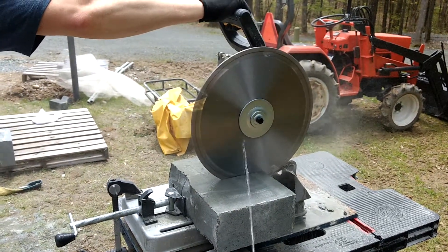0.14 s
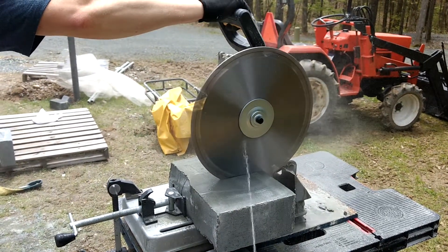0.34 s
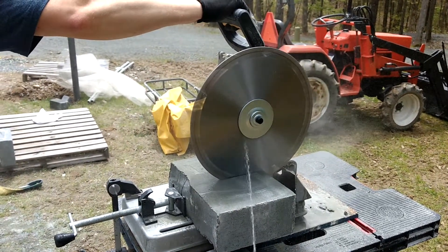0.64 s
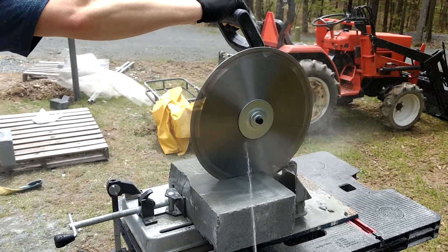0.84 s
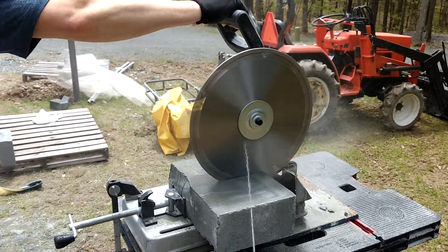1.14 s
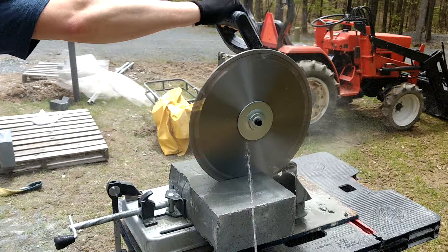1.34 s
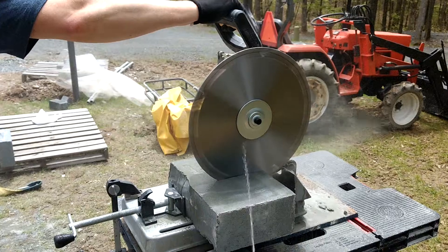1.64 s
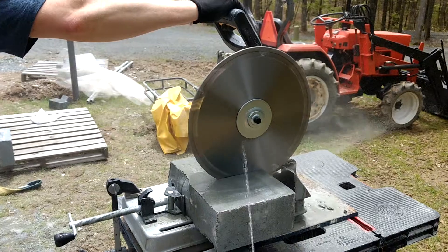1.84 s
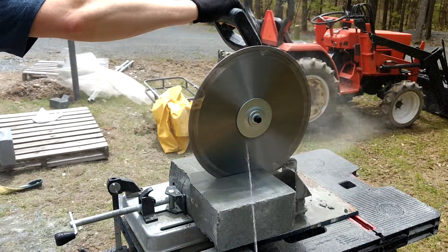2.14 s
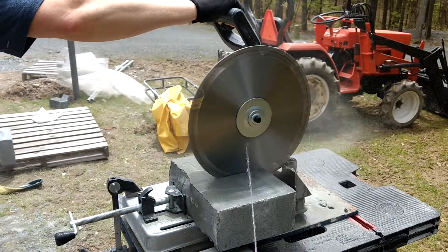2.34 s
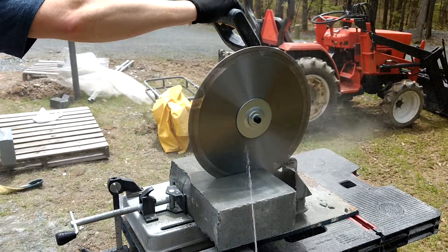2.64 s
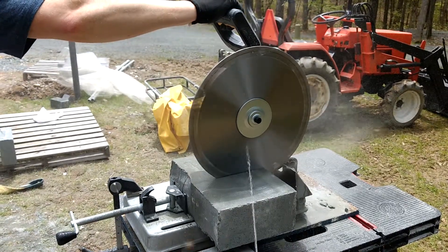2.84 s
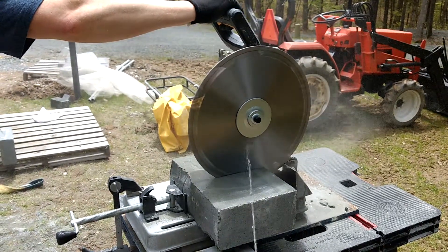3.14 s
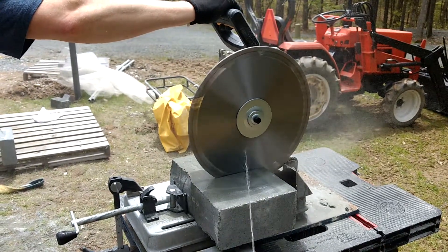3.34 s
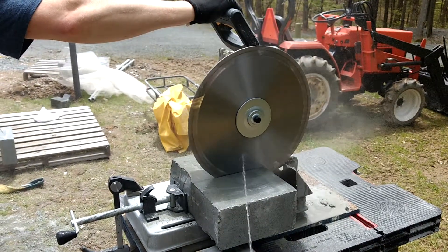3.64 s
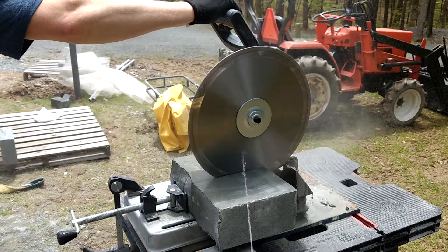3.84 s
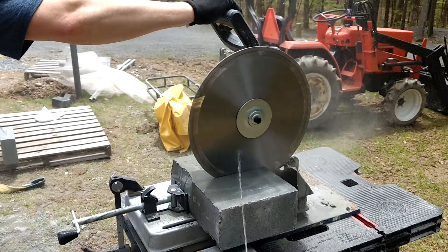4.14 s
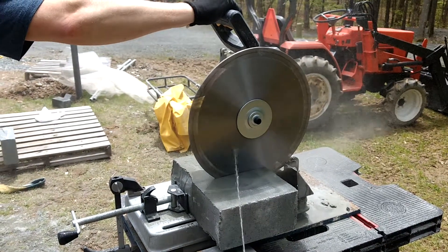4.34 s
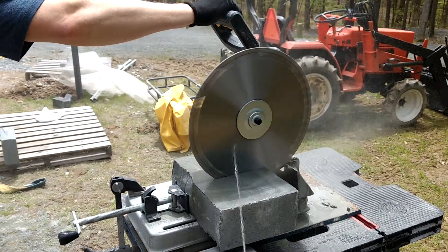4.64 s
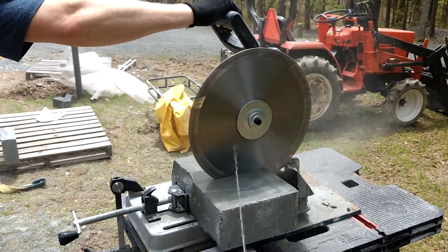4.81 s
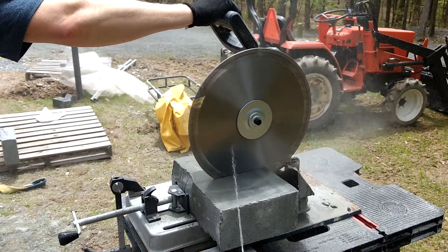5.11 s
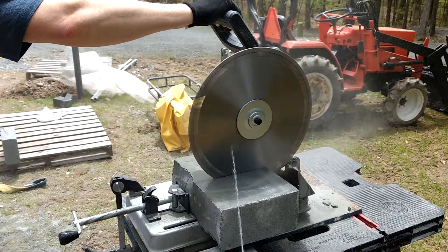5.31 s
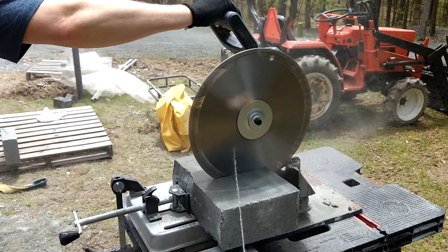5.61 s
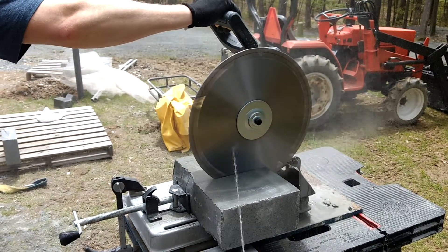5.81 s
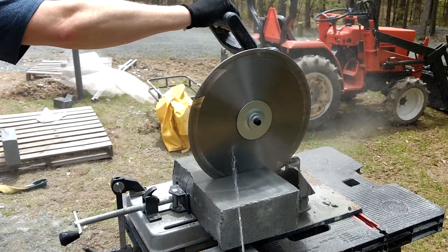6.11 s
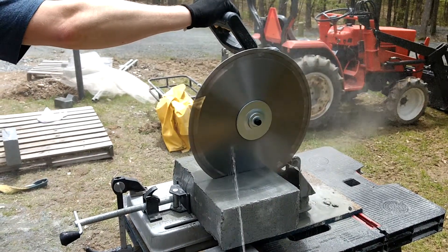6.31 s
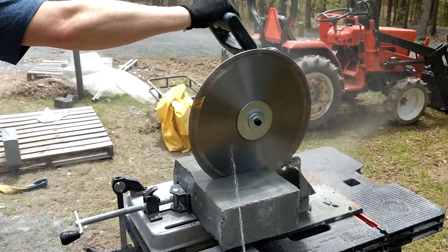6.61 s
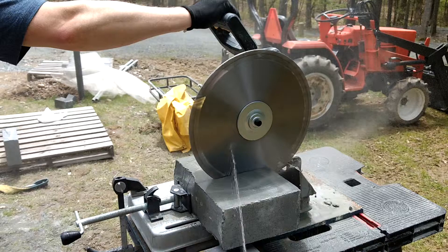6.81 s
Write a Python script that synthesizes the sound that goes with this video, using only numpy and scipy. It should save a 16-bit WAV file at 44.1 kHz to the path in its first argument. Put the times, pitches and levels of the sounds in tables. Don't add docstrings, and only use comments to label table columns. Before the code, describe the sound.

Continuous gritty stone cutting with metallic singing from a spinning blade, hissing water spray, low gearbox rattle and irregular thumps of breeze.

```python
import sys
import numpy as np
from scipy import signal
from scipy.fft import rfft, irfft, next_fast_len
from scipy.io import wavfile
from scipy.ndimage import uniform_filter1d

SR = 44100
rng = np.random.default_rng(int(sys.argv[2]) if len(sys.argv) > 2 else 0)


def gain_from_db(level_db):
    decades = np.asarray(level_db, float) / 20
    return 10 ** decades


def master(y):
    cut = np.clip(np.atleast_2d(y).T, -1, 1)
    pcm = np.round(cut * 32767)
    wavfile.write(sys.argv[1], SR, pcm.astype(np.int16))


N = 306936
TIME = np.arange(N) / SR
FREQ = np.fft.rfftfreq(next_fast_len(N), 1 / SR)


def unit(x):
    return x / np.sqrt(np.mean(x ** 2))


def ring(x, hz, width):
    return signal.lfilter(*signal.iirpeak(hz, hz / width, SR), x)


def colour(x, points):
    hz, db = np.transpose(points)
    gain = gain_from_db(np.interp(np.log(FREQ + 1), np.log(hz), db))
    return unit(irfft(rfft(x, next_fast_len(N)) * gain)[:N])


def walk(rate):
    hold = int(SR / rate)
    steps = np.repeat(rng.standard_normal(N // hold + 1), hold)
    steps = uniform_filter1d(uniform_filter1d(steps, hold), hold)[:N]
    return steps / steps.std()


def ports(x, lag, right_db=0, sign=-1):
    delay = np.exp(-2j * np.pi * FREQ * lag / SR)
    shifted = irfft(rfft(x, next_fast_len(N)) * delay)[:N]
    return np.array([x, sign * gain_from_db(right_db) * shifted])


def per_turn(turns, memory, count=1024):
    wear = turns / memory
    profile = rng.standard_normal((int(turns[-1]) + 2, count))
    row = wear.astype(int)
    place = (turns % 1 * count).astype(int)
    share = np.pi / 2 * (wear % 1)
    return np.cos(share) * profile[row, place] + np.sin(share) * profile[row + 1, place]


# time in seconds, speed in turns per second.
SHAFT_SPEED = [(0, 45.15), (.5, 45.1), (1.05, 44.7), (1.5, 44.2), (1.8, 43.6), (2, 43.1), (2.2, 42.45),
               (2.5, 42.1), (3.2, 41.9), (4, 42), (6.96, 41.95)]


def shaft_speed():
    return np.interp(TIME, *np.transpose(SHAFT_SPEED))


# time in seconds, grinding level in dB.
FEED_LEVEL = [(0, -31.5), (.3, -34), (.6, -31), (1.1, -29.5), (1.28, -30), (1.55, -28.5), (1.99, -27.5),
              (2.15, -29), (2.4, -29), (3.3, -30.5), (3.7, -28.5), (4.6, -29), (5.0, -30), (5.8, -29),
              (6.3, -28.5), (6.7, -28), (6.85, -28.5), (6.96, -35)]


def feed_level():
    return np.interp(TIME, *np.transpose(FEED_LEVEL))


# peak time in seconds, peak level in dB, half length in seconds.
SWELLS_1 = [(0.287, -21, 0.15), (0.572, -23, 0.084), (.87, -27, .12), (1.56, -24, 0.32), (2.0, -28, .1),
            (2.6, -29, 0.22), (3.047, -27, 0.22), (3.55, -23, .1), (4.13, -16, .2), (4.54, -23, 0.12),
            (4.825, -24, .08), (5.443, -24.5, 0.23), (6.1, -27, 0.2), (6.647, -26, 0.096)]
SWELLS_2 = [(.25, -37, 0.065), (.6, -30, .07), (1.5, -28, .1), (2.0, -37, 0.12), (3.55, -24, 0.17),
            (3.82, -29, .08), (4.4, -38, 0.14), (5.3, -26, .15), (5.55, -34, 0.063), (6.3, -32, 0.21),
            (6.7, -21, .08)]
SWELLS_3 = [(.3, -37, 0.085), (.6, -28, 0.16), (1.65, -23, 0.066), (1.95, -26.5, 0.11),
            (3.55, -34.5, 0.092), (4.0, -24.5, 0.11), (4.24, -24.5, 0.21), (4.6, -26, 0.16),
            (4.83, -27, 0.09), (5.11, -32, 0.12), (5.65, -19, 0.08), (6.15, -29, .13), (6.42, -24.5, 0.21),
            (6.7, -21, 0.091)]
SWELLS_4 = [(1.55, -35, .1), (2.02, -20.5, .09), (2.9, -39, 0.036), (4.1, -38, 0.21), (4.85, -26.5, .15),
            (5.15, -29, .08), (6.4, -32, 0.4), (6.8, -29.5, .08)]
SWELLS_5 = [(1.42, -35, .07), (1.96, -25, 0.18), (2.27, -21, 0.075), (2.56, -28.5, 0.11), (2.85, -28, 0.25),
            (3.43, -38, .14), (4.4, -31.5, 0.068), (4.83, -42, 0.088), (5.2, -32, 0.43), (5.82, -35, 0.2),
            (6.1, -32, 0.18), (6.4, -24.5, 0.15), (6.68, -23.5, 0.11)]
RESTING_LEVEL = [-36.5, -21.5, -27.5, -31, -33.5]


def singing_levels():
    levels = []
    for rows, resting_db in zip((SWELLS_1, SWELLS_2, SWELLS_3, SWELLS_4, SWELLS_5), RESTING_LEVEL):
        bells = sum(gain_from_db(db) * np.exp(-((TIME - s) / half_s) ** 2) for s, db, half_s in rows)
        levels.append(20 * np.log10(gain_from_db(resting_db) + bells))
    return levels


# frequency in Hz, width in Hz.
SINGING_MODES = [(3230, 25), (3732, 35), (4116, 45), (4698, 30), (6045, 45)]
# frequency in Hz, width in Hz, level in dB.
BLADE_MODES = [(3149, 20, -3), (3350, 40, -4), (3569, 25, -2), (3615, 25, -5), (4492, 25, -9),
               (5324, 110, -6), (5830, 35, -8), (6347, 60, -16), (6673, 40, -4), (6842, 25, -11),
               (7095, 30, -12), (7257, 40, -14), (7467, 40, -10), (7852, 60, -9), (8059, 30, -13),
               (8272, 50, -11), (8550, 250, -15), (9033, 40, -13), (9534, 50, -11), (9868, 70, -12),
               (10040, 140, -11), (10530, 90, -13), (11041, 60, -7), (11526, 60, -7), (12048, 100, -10)]
# frequency in Hz, density in dB per Hz.
GRIT_SPECTRUM = [(1000, -40), (1700, -6), (2100, -3), (2700, 0), (3450, -3), (4000, -3), (5000, -4),
                 (6400, -5), (8500, -3), (10500, -1), (12000, -1.5), (13000, -14), (16000, -18)]


def blade(turns, feed_db):
    repeat = .6
    runout = 1 + .19 * np.cos(2 * np.pi * turns) + 0.081 * np.cos(4 * np.pi * turns + 1.0)
    scrape = np.sqrt(repeat) * per_turn(turns, 8.3) + np.sqrt(1 - repeat) * rng.standard_normal(N)
    scrape = runout * scrape
    rings = sum(gain_from_db(db + 1.7 * walk(3.976)) * ring(ring(scrape, hz, width), hz, 130)
                for hz, width, db in BLADE_MODES)
    judder = gain_from_db(0.22 * walk(15.0) + 1.47 * walk(40.0))
    grit = colour(runout * rng.standard_normal(N), GRIT_SPECTRUM) * judder
    sung = sum(gain_from_db(db) * unit(ring(ring(scrape, hz, width), hz, 133))
               for (hz, width), db in zip(SINGING_MODES, singing_levels()))
    return gain_from_db(feed_db) * (gain_from_db(0.33) * unit(rings) + gain_from_db(0.5) * grit) + gain_from_db(-11.0) * sung


# frequency in Hz, density in dB per Hz.
SPRAY_SPECTRUM = [(9000, -50), (11800, -22), (12700, 0), (13600, -4), (14300, 0), (16000, 0)]
# frequency in Hz, width in Hz, level in dB.
FLANGE_MODES = [(12538, 50, -2), (13394, 70, -7), (13894, 80, 0), (14190, 40, -3), (14691, 40, -5),
                (14842, 50, 0), (15202, 70, 0)]


def spray(feed_db):
    hiss, drops = rng.standard_normal((2, N))
    rings = sum(gain_from_db(db + 1.3 * walk(8.1)) * ring(ring(drops, hz, width), hz, 400)
                for hz, width, db in FLANGE_MODES)
    follow = gain_from_db(0.23 * (feed_db - feed_db.mean()))
    return follow * (gain_from_db(-31.3) * colour(hiss, SPRAY_SPECTRUM) + gain_from_db(-34.3) * unit(rings))


# frequency in Hz, density in dB per Hz.
BENCH_SPECTRUM = [(40, -55), (90, -30), (250, -11), (500, -4), (800, -1), (1150, -6), (1500, -5),
                  (2200, -25)]
# multiple of the shaft speed, level in dB.
SHAFT_HUM = [(5, -51.5), (9, -50)]


def gearbox(turns, speed):
    knock = per_turn(turns, 5.0) + 1.17 * rng.standard_normal(N)
    housing = gain_from_db(-43.0) * unit(ring(ring(knock, 666, 44), 693, 140))
    bench = gain_from_db(-36.0) * colour(knock + 1.86 * rng.standard_normal(N), BENCH_SPECTRUM)
    slack = gain_from_db(np.clip(45 * (speed - 45.1), -14, 0))
    hum = slack * sum(gain_from_db(db + 3) * np.sin(2 * np.pi * multiple * turns) for multiple, db in SHAFT_HUM)
    arm = unit(ring(ring(per_turn(turns, 38.8) + 0.42 * knock, 1633, 109), 1910, 900))
    through_stand = gain_from_db(walk(6.0)) * (housing + bench) + hum
    return ports(through_stand, -4.5, sign=0.98) + ports(gain_from_db(-43.5) * arm, -19.5, right_db=9.5)


def fan(speed):
    air = ring(ring(rng.standard_normal(N), 2840, 234), 3330, 680)
    return gain_from_db(-32.5 + 0.4 * (speed - 40.5) + 1.5 * walk(6.0)) * unit(air)


def add_eddy(out, start_s, depth, width_ms):
    rise_s = max(width_ms, .5) / 1000 * .6
    age = np.arange(600) / SR / rise_s
    i = max(int((start_s - rise_s) * SR), 0)
    drop = (age * np.exp(1 - age)) ** 1.3
    tail = .6 * (1 - np.exp(-age)) * np.exp(-age / 3)
    out[i:i + 600] -= depth * (drop + tail)[:N - i]


# time in seconds, level in dB.
BREEZE_LEVEL = [(0, -59.5), (.47, -58), (.55, -48.5), (1.3, -52.5), (1.75, -43.5), (2.1, -46), (2.25, -50),
                (2.7, -48.5), (3.4, -50.5), (4.1, -50.5), (4.9, -48.5), (5.5, -45.5), (5.75, -54),
                (6.0, -46.5), (6.5, -46.5), (6.7, -47.5), (6.85, -47.5)]
# time in seconds, depth in dB, width in milliseconds.
EDDIES = [(0.9167, -13.0, 0.88), (1.0285, -11.4, 1.13), (1.5925, -11.6, 0.66), (1.7583, -10.5, 0.93),
          (1.8388, -12.1, 0.61), (2.0, -6.8, 0.91), (2.0525, -12.5, 1.07), (2.0701, -11.2, 0.91),
          (2.1196, -7.8, 0.68), (2.132, -12.4, 0.7), (2.3638, -11.4, 0.93), (2.9491, -11.7, 0.75),
          (3.092, -13.0, 0.77), (3.5276, -9.5, 0.73), (4.0083, -12.8, 1.09), (4.3104, -12.8, 1.54),
          (4.4133, -11.6, 1.34), (4.8467, -9.9, 1.02), (4.9364, -12.1, 0.95), (4.9657, -12.6, 1.07),
          (5.1337, -11.0, 0.82), (5.1839, -11.8, 0.77), (6.0101, -11.7, 0.95), (6.1442, -12.1, 0.86),
          (6.3196, -10.9, 0.63), (6.4101, -13.0, 0.88), (6.7541, -11.7, 0.79), (6.8022, -12.3, 1.13),
          (6.8408, -10.7, 1.11), (6.9203, -8.7, 1.0)]
# time in seconds, depth in dB.
MORE_EDDIES = [(.535, -12), (.78, -13.5), (0.8023, -13), (1.004, -10.5), (1.0362, -16), (1.115, -12),
               (1.2588, -13), (1.3861, -11), (1.439, -11.5), (1.7107, -15.5), (1.7344, -17), (2.5424, -13),
               (2.708, -13), (3.7463, -12.5), (3.831, -11), (3.8886, -9.5), (3.9992, -13.5), (4.195, -14),
               (4.4993, -14.5), (4.5966, -13), (4.6899, -11), (4.717, -10), (4.799, -11.5), (5.215, -18),
               (5.4872, -17), (5.6857, -14), (5.954, -12), (6.226, -11.5), (6.5094, -13.5), (6.8944, -12.5)]
# frequency in Hz, density in dB per Hz.
WAKE_SPECTRUM = [(60, -29), (130, -3), (400, -12), (1200, -10), (2500, -24)]


def breeze():
    common_ms, trail_s, trail_db = .85, .022, -37
    breeze_db = np.interp(TIME, *np.transpose(BREEZE_LEVEL))
    eddies = EDDIES + [(s, db, common_ms) for s, db in MORE_EDDIES]
    trails = sum(gain_from_db(db + trail_db) * (TIME > s) * np.exp(-np.abs(TIME - s) / trail_s)
                 for s, db, _ in eddies)
    gust = gain_from_db(14.5) * (gain_from_db(breeze_db + 2.14 * walk(14.0)) + trails)

    pops, flutter = np.zeros(N), np.zeros(N)
    for start_s, db, width_ms in eddies:
        add_eddy(pops, start_s, gain_from_db(db + .5), width_ms)
    for place, size, wide in rng.random((90, 3)):
        i = int(place * (N - 1))
        stray_db = min(breeze_db[i], -49) + 30.5 + 3 * size
        add_eddy(pops, i / SR, gain_from_db(stray_db), 0.48 + 0.87 * wide)
    for place, size, wide in rng.random((1600, 3)):
        depth = gain_from_db(-2.4 * np.log(size + 0.038))
        add_eddy(flutter, place * (N - 1) / SR, depth, 0.24 + 2.37 * wide)

    fading = np.exp(-1 / (0.013 * SR))
    wake = signal.lfilter([1 - fading], [1, -fading], -pops)
    wake = wake * colour(rng.standard_normal(N), WAKE_SPECTRUM)
    leak = signal.butter(2, 95, "high", fs=SR, output="sos")
    cavity = signal.butter(1, 2200, fs=SR, output="sos")
    bursts = signal.sosfilt(cavity, signal.sosfilt(leak, pops)) + gain_from_db(2.5) * wake
    return bursts + gust * unit(signal.sosfilt(leak, flutter))


# frequency in Hz, density in dB per Hz.
SCATTER_SPECTRUM = [(100, -50), (1100, -14), (1800, -5), (2500, -3), (3600, 2), (4500, -11), (7200, -12),
                    (9000, -4), (10600, -10), (12000, 0), (13400, 3), (14500, -1), (16000, -1)]


def scatter(feed_db):
    sides = np.array([colour(rng.standard_normal(N), SCATTER_SPECTRUM) for side in "LR"])
    return gain_from_db(feed_db - 5) * sides


def scene():
    speed = shaft_speed()
    turns = np.cumsum(speed) / SR
    feed_db = feed_level()
    saw = ports(blade(turns, feed_db) + fan(speed), -24.8)
    near_left = ports(spray(feed_db) + breeze(), 16.3)
    return saw + scatter(feed_db) + gearbox(turns, speed) + near_left


def low_pass(x):
    return signal.sosfilt(signal.butter(12, 16540, fs=SR, output="sos"), x)


def record(dry):
    bass_cut = signal.butter(1, 12, "high", fs=SR, output="sos")
    top_cut = signal.ellip(12, .2, 80, 15450, fs=SR, output="sos")
    mix = signal.sosfilt(top_cut, signal.sosfilt(bass_cut, dry))
    return low_pass(mix)


dry = scene()
out = record(dry)
master(out)
```